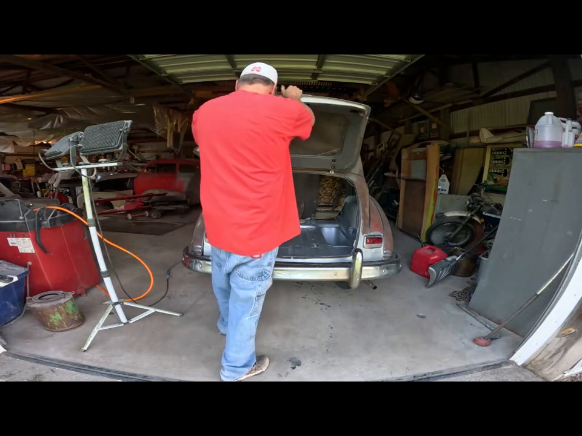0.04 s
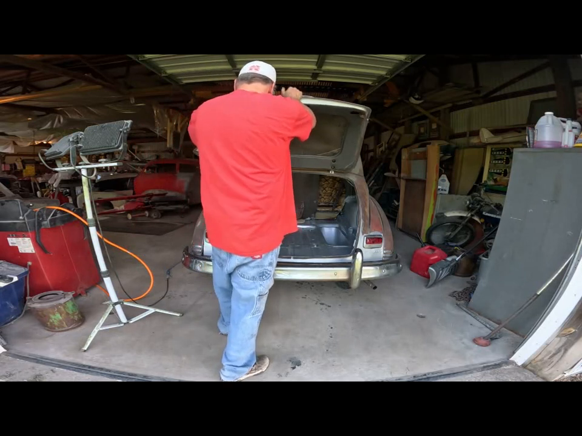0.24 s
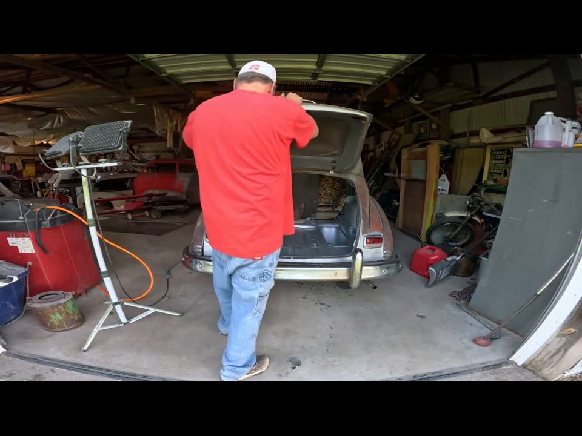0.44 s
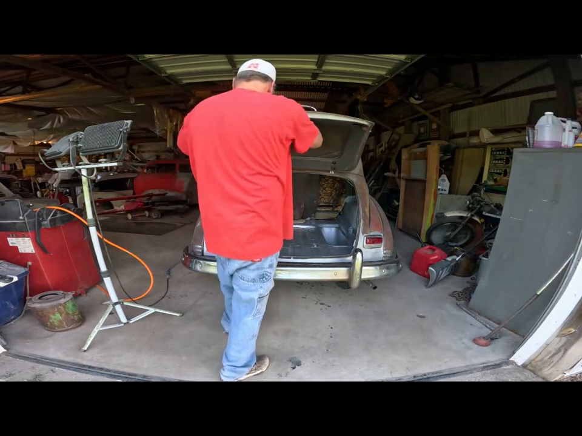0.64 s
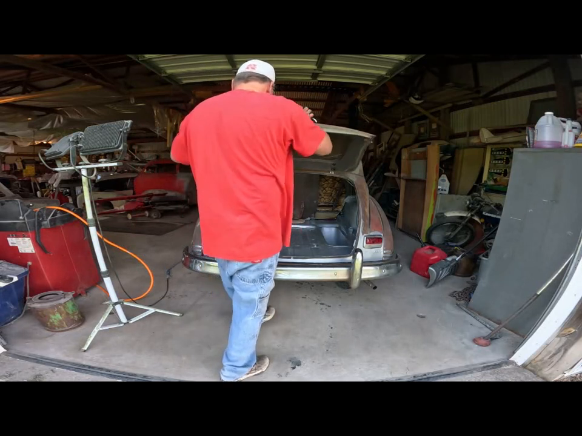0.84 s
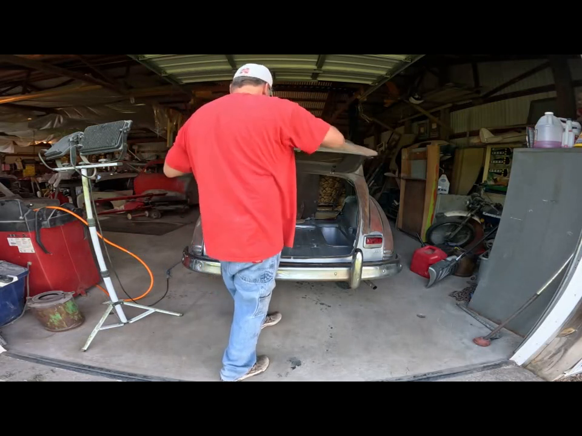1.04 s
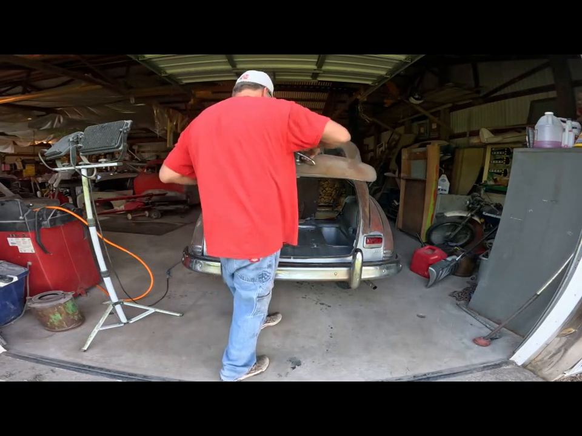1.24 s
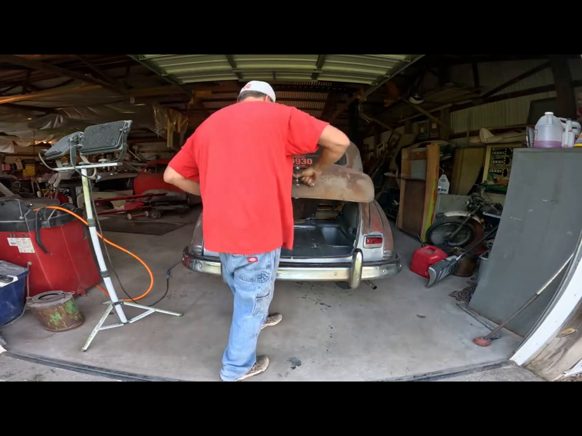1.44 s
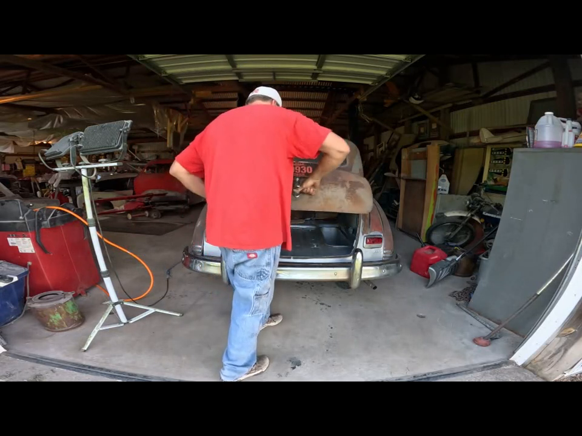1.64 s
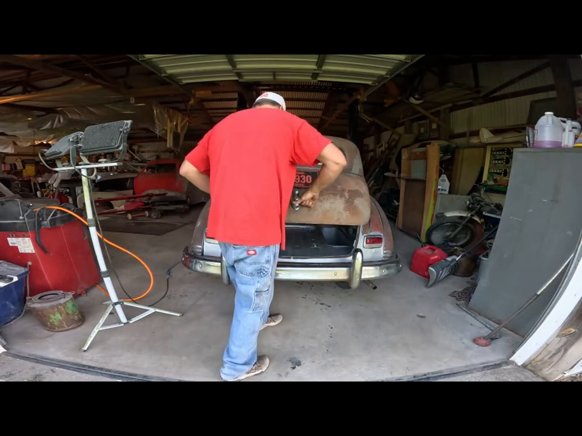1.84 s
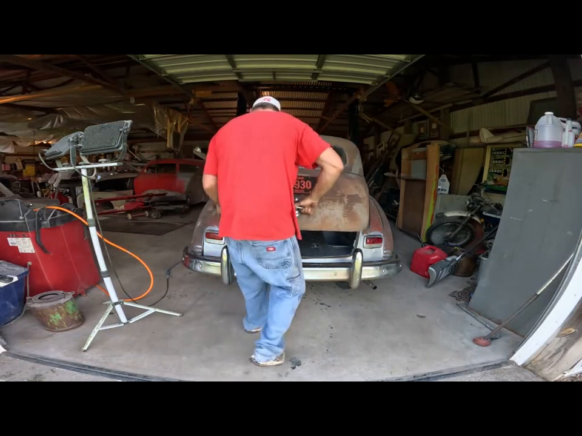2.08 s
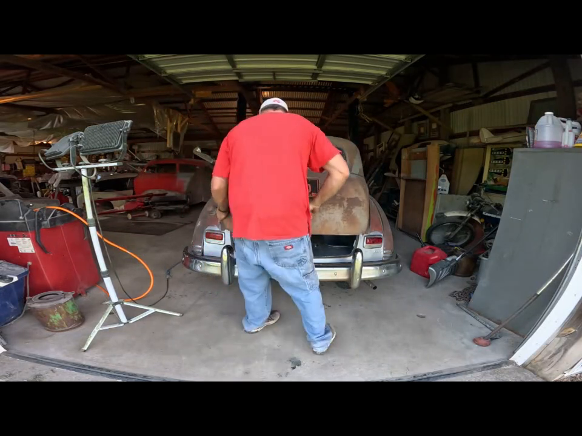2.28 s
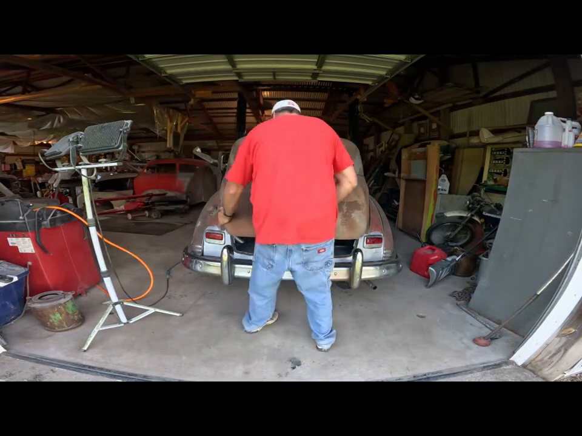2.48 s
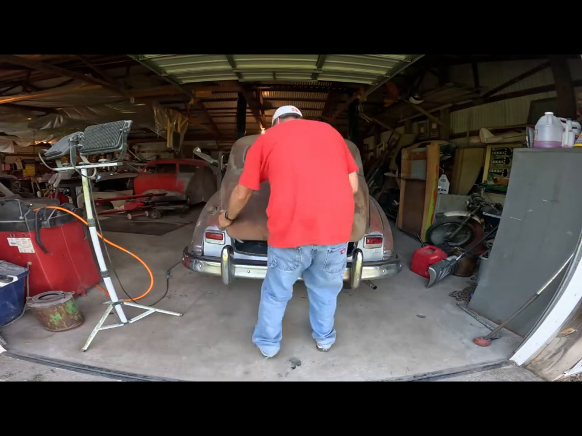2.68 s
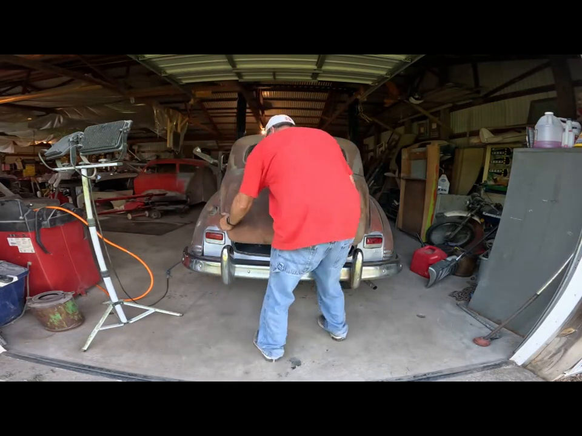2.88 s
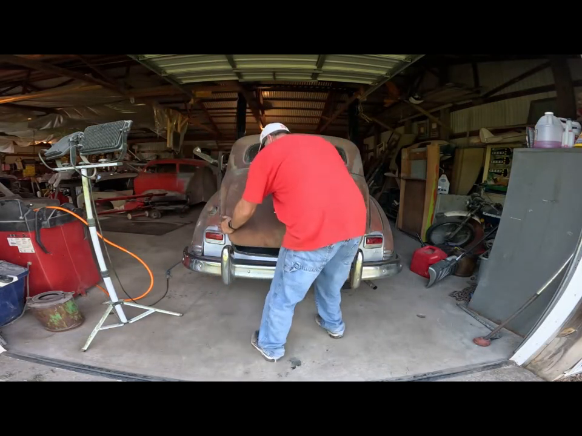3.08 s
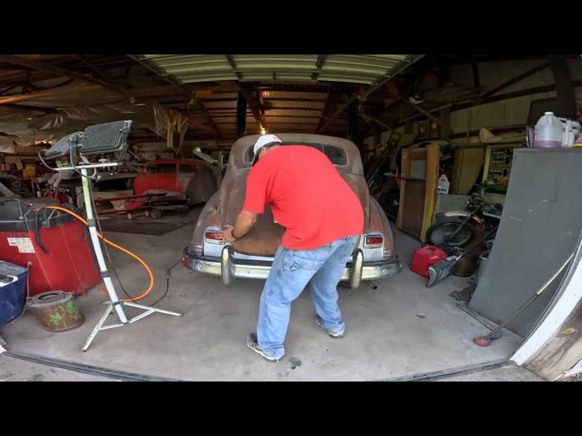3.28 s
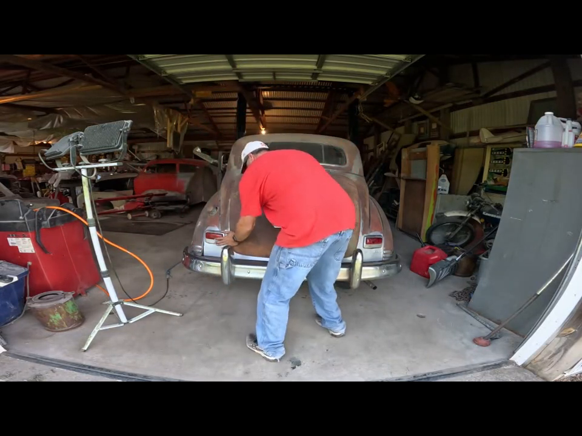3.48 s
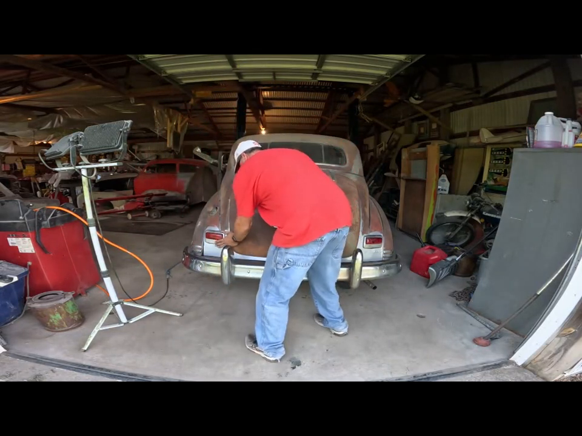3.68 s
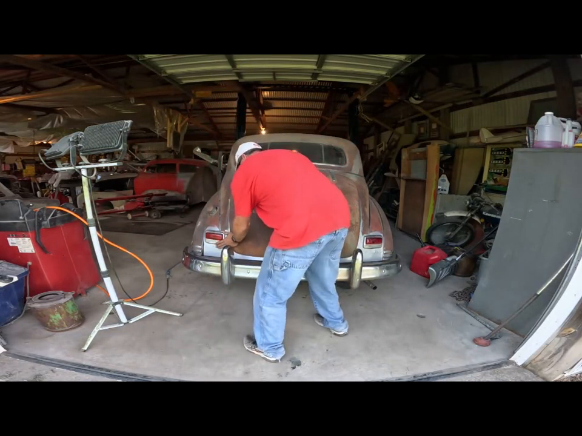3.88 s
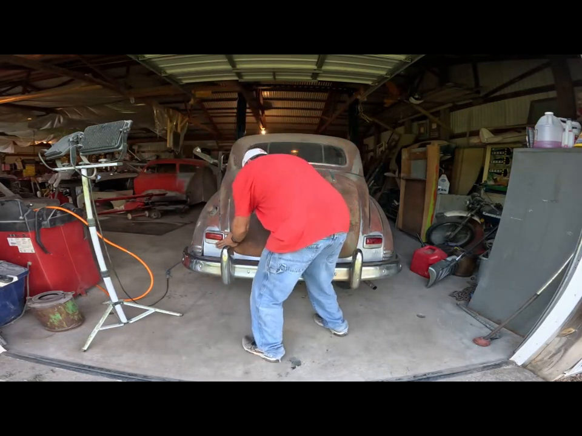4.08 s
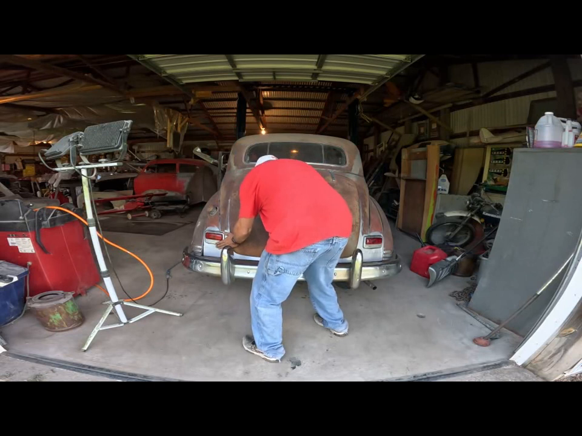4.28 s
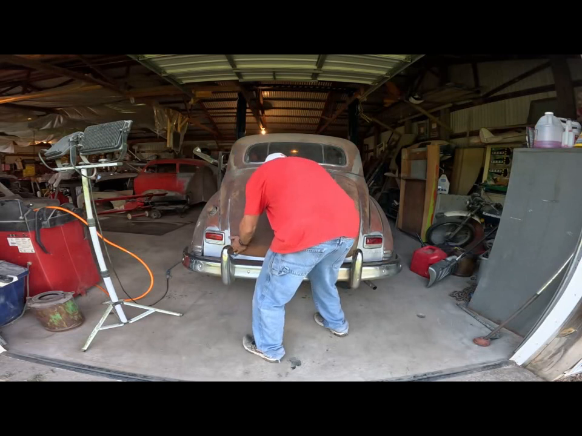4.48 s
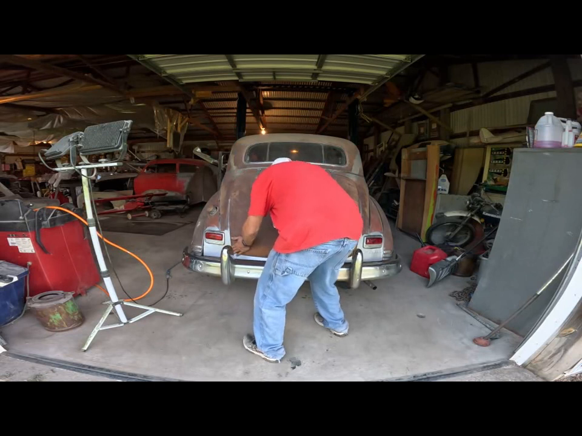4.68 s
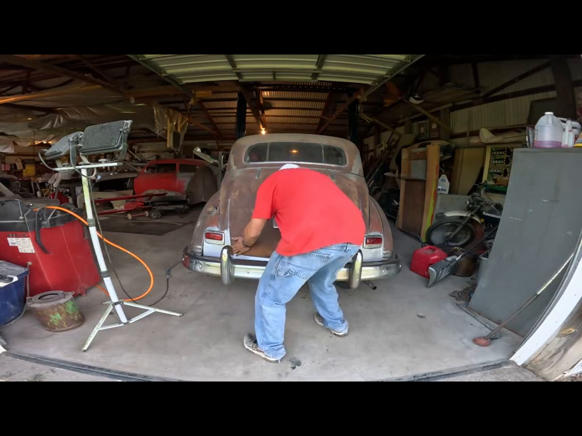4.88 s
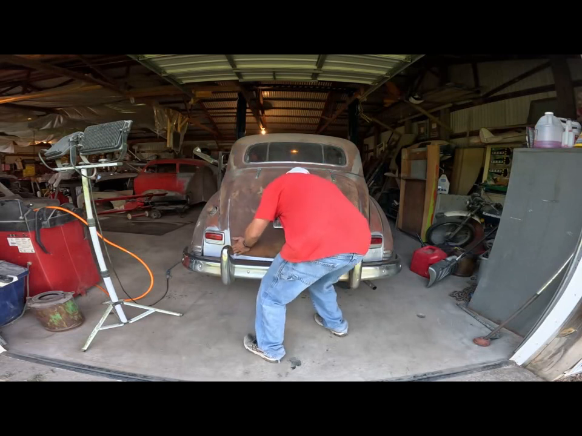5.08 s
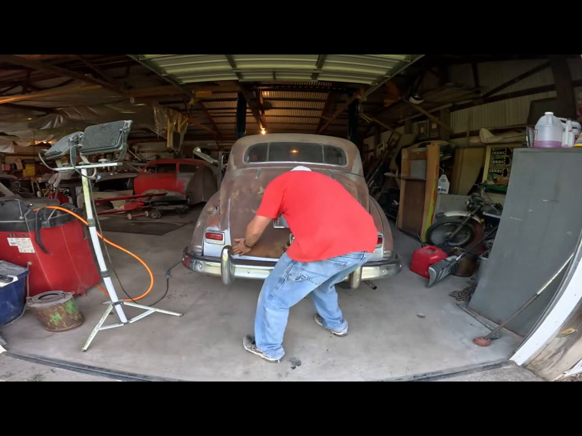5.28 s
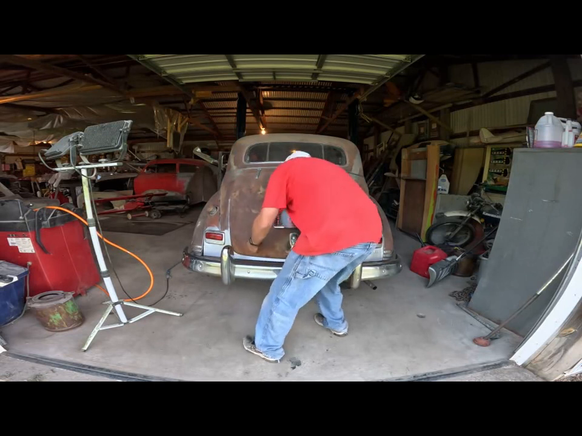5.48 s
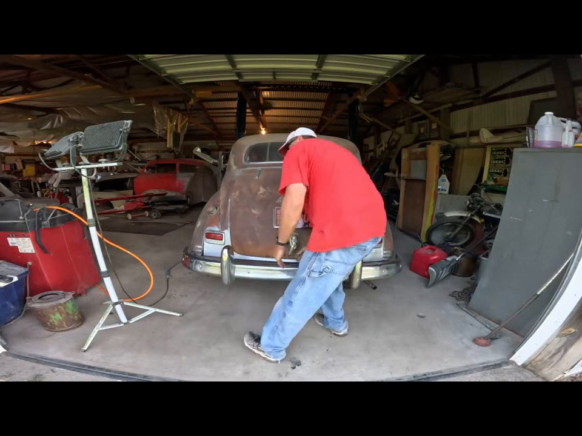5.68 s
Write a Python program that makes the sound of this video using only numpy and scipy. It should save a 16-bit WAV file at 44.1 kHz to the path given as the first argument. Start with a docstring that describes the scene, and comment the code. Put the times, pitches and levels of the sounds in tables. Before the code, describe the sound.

In a reverberant garage, an old car's steel trunk lid is pulled down with a hollow knock, lighter bumps and faint hinge squeaks. Shoes scuff on gritty concrete. The lid slams with a loud, booming bang, and a loose metal part rattles quickly for about a second. Then a hard shove latches it with a sharp thud. The sounds sit slightly right of the microphone, over a faint machine hum.

```python
"""The steel trunk lid of an old car is pulled down, slammed, then shoved until its latch snaps shut.
Each impact excites the bending modes of the sheet; the body and the enclosed air boom, and after
the slam a loose part rattles between two stops. On the way down the hinges knock, scrape and squeak
by stick-slip friction. Shoes scuff gritty concrete and clothes rustle, while the garage
reverberates over a soft background noise and the hum of a distant machine."""
import sys
import numpy as np
from scipy import signal
from scipy.fft import rfft, irfft
from scipy.io import wavfile
from scipy.ndimage import uniform_filter1d

SR = 44100
rng = np.random.default_rng(int(sys.argv[2]) if len(sys.argv) > 2 else 0)


def put_to_file(sound):
    """Save the sound as 16-bit audio at rate SR, in the file named by the first command-line argument."""
    columns = np.atleast_2d(sound).T  # one column per channel
    safe = np.clip(columns, -1, 1)
    whole_steps = np.round(safe * 32767)
    wavfile.write(sys.argv[1], SR, whole_steps.astype(np.int16))


N = 252604
TIME = np.arange(N) / SR
RING = TIME[:SR]  # time axis of a one-second impulse response

# the lid meets its frame, corner by corner: (time [s], level [dB], cutoff [Hz], most excited [Hz])
SLAM = [(3.447, -15, 3000, 448), (3.459, -14, 9700, 1240), (3.471, -31, 4080, 1650),
        (3.485, -20.5, 890, 170), (3.545, -30.5, 3000, 910), (3.591, -29.5, 1500, 505),
        (3.672, -30.5, 2280, 840)]
# modes of the latch and its spring: (frequency [Hz], level [dB], t60 [s])
LATCH_MODES = [(4300, -6, .06), (4544, -1, .13), (4720, -17, .4), (4764, 0, .08), (4860, 7, .025),
               (5730, -3, .04), (6600, 5, .027), (6780, 6, .035), (6880, -15, .35), (9400, -5, .06)]
# spectrum of a sole on concrete: (frequency [Hz], level [dB])
SOLE_SPECTRUM = [(240, -21), (400, 11), (612, 16.5), (907, 6), (1060, 18), (1190, 14), (1520, 15),
                 (2740, 5), (6420, -10), (6920, -10.5), (15000, -37.5)]


def slam(first_t60=0.04, doubling_s=0.017, longest_t60=0.38):
    """Successive impacts: each finds the lid more shaken, so its chatter lasts longer, up to a limit."""
    # spectrum of the slam: (frequency [Hz], level [dB])
    spectrum = [(59, -48.5), (100, -1), (230, -8), (400, -6.5), (594, -9.5), (814, -13.5), (1000, -11.5),
                (1500, -13), (2420, -16.5), (2860, -14), (4180, -20), (5600, -19.5), (6090, -21.5),
                (15000, -42)]
    contacts = []
    for s, db, cutoff_hz, spot_hz in SLAM:
        t60 = min(first_t60 * 2 ** ((s - SLAM[0][0]) / doubling_s), longest_t60)
        contacts.append((s, db, cutoff_hz, t60, spot_hz))
    return lid_impacts(contacts, spectrum, modes_db=-7, crack_db=-18.5, panel_db=-8, panel_t60=0.46,
                       rise_s=0.0053, spot_db=2, bass_cut=0.2)


def shove():
    """Hard impact: a fast rise of force gives a sharp crack as the lid is driven home."""
    # contacts: (time [s], level [dB], cutoff [Hz], chatter t60 [s], most excited [Hz])
    contacts = [(5.152, -31, 1600, 0.052, 1210), (5.159, -10.5, 9000, 0.03, 1300),
                (5.1635, -17, 1600, 0.1, 420), (5.166, -21.5, 240, 0.22, 180), (5.18, -26, 3500, .25, 2200)]
    # spectrum of the shove: (frequency [Hz], level [dB])
    spectrum = [(24, -10), (60, -6), (110, 0), (175, 3.5), (260, -2), (410, -1), (600, -5), (760, -12.5),
                (950, -11), (1150, -4.5), (1380, -7), (1610, -6), (1950, -10), (2500, -15), (2990, -16),
                (3850, -22), (4500, -14), (5300, -20), (6700, -16), (7600, -25), (15000, -49)]
    return lid_impacts(contacts, spectrum, modes_db=-12, crack_db=-6, panel_db=-8, panel_t60=0.55,
                       rise_s=0.0008, spot_db=3, bass_cut=0.24)


def knocks(rebound_s=0.023, knock_t60=0.086, thump_t60=0.26, thump_cutoff_hz=170, thump_spot_hz=162):
    """Contact stiffness sets bandwidth: hard hinge knocks rebound once, soft panel thumps sound dull."""
    # knocks in the hinges: (time [s], level [dB], most excited [Hz], relative rebound level [dB])
    hinge_knocks = [(.004, -18.5, 524, -39), (.015, -18, 235, -11.5), (0.489, -31.5, 163, -3.5),
                    (0.49, -41.5, 1600, -28), (0.541, -28, 252, 2), (0.782, -36, 225, 0.5),
                    (0.93, -40.5, 270, -3), (1.468, -33.5, 554, -31), (1.51, -39.5, 503, -8),
                    (1.617, -38, 534, 5), (1.643, -33.5, 380, -3), (4.087, -35, 604, -3),
                    (4.108, -39.5, 1800, -28), (4.165, -42, 358, -16)]
    # thumps on the middle of the panel: (time [s], level [dB])
    panel_thumps = [(1.569, -37.5), (3.93, -33.5), (4.0, -34), (4.814, -39), (4.913, -43.5)]
    # spectrum of both: (frequency [Hz], level [dB])
    spectrum = [(30, -17), (100, 2.5), (160, 2.5), (240, 4), (330, -2.5), (470, -3), (700, -10.5),
                (1200, -10.5), (2000, -18.5), (4000, -26.5), (9000, -37.5), (15000, -52)]
    contacts = []
    for s, db, spot_hz, rebound_db in hinge_knocks:
        cutoff_hz = 990 * (spot_hz / 300) ** 0.67  # a harder contact excites higher modes
        contacts.append((s, db, cutoff_hz, knock_t60, spot_hz))
        contacts.append((s + rebound_s, db + rebound_db, cutoff_hz, knock_t60, spot_hz))
    hard = lid_impacts(contacts, spectrum, modes_db=-4, crack_db=-13, panel_db=-0.5, panel_t60=0.42,
                       rise_s=0.0017, spot_db=7, bass_cut=0.53)
    contacts = [(s, db, thump_cutoff_hz, thump_t60, thump_spot_hz) for s, db in panel_thumps]
    soft = lid_impacts(contacts, spectrum, modes_db=-14, crack_db=-6.5, panel_db=-4, panel_t60=0.4,
                       rise_s=0.003, spot_db=11, bass_cut=0.47)
    return hard + soft


def lid_impacts(contacts, spectrum, modes_db, crack_db, panel_db, panel_t60, rise_s, spot_db, bass_cut):
    """Impact on a plate: the struck spot favours some modes, and a soft contact acts as a low-pass."""
    # bending modes of the sheet steel: (frequency [Hz], level [dB], t60 [s])
    lid_modes = [(192, 3, .25), (240, 2, .42), (252, 2, .35), (321, -3, .35), (427, 4, .22), (474, -1, .25),
                 (535, 1, .25), (630, 0, .22), (790, -1, .2), (931, 7, .27), (1061, 4, .22), (1159, 5, .16),
                 (1244, 4, .19), (1390, 4, .2), (1568, 5, .17), (1682, 2, .22), (1880, 4, .25),
                 (2015, 3, .25), (2115, 4, .25)]
    steel = unit(colour(ring(lid_modes), spectrum))
    out = np.zeros(N)
    for s, db, cutoff_hz, t60, spot_hz in contacts:
        force = (chatter(t60) + undb(panel_db) * panel(panel_t60)) * (1 - np.exp(-RING / rise_s))
        force[0] += undb(crack_db)
        sound = unit(colour(force, spectrum)) + undb(modes_db) * steel
        sound = shape(sound, lambda hz: spot_db * near(hz, spot_hz, 0.3) + rolloff(hz / cutoff_hz, 1))
        # a stiff spot gives little bass
        sound = shape(sound, lambda hz: rolloff(bass_cut * spot_hz / (hz + 20), 3))
        add(out, s, at_level(sound, db))
    return out


def chatter(t60):
    """A dying swarm of tiny contacts sums to decaying noise, here with its spectrum flattened."""
    swarm = rng.standard_normal(len(RING)) * fade(t60)
    power = uniform_filter1d(abs(rfft(swarm)) ** 2, size=120)
    bin_hz = np.linspace(0, SR / 2, len(power))
    return unit(shape(swarm, lambda hz: -10 * np.log10(np.interp(hz, bin_hz, power))))


def panel(t60, spacing_hz=14):
    """A thin plate has constant modal density: weak modes lie at random, equally dense at all pitches."""
    bins = len(RING) // 2 + 1
    present = rng.random(bins) < SR / len(RING) / spacing_hz
    phases = np.exp(2j * np.pi * rng.random(bins))
    return unit(irfft(present * phases) * fade(t60))


def body():
    """Shell and cavity resonance: the body and its air boom, each push favouring its own low pitch."""
    # modes of the body and the air in the trunk: (frequency [Hz], level [dB], t60 [s])
    body_modes = [(28, 1, 1.0), (38, -5, .9), (50, -4.5, .4), (66, 1, .5), (80, 0, .65), (88, 4, .18),
                  (108, -1, .85), (135, 1, .3), (158, -9, 1.0), (188, 2, .22), (201, -9, 1.0),
                  (322, -7, 1.4), (378, -9, 1.3)]
    # pushes on the body: (time [s], level [dB], most excited [Hz])
    pushes = [(.004, -32.5, 39.2), (0.557, -38, 74), (1.639, -39.5, 40.5), (3.452, -22.5, 89),
              (3.47, -14.5, 47.2), (3.476, -28.5, 170), (3.494, -31, 200), (5.16, -35, 56)]
    out = np.zeros(N)
    for s, db, centre_hz in pushes:
        boom = ring(body_modes, lambda hz: near(hz, centre_hz, octaves=1.17), TIME[:SR * 2])
        add(out, s, undb(db) * boom)
    return out


def shudder(db=-32, centre_hz=192.5, t60=2.34):
    """Free decay: after the slam the rear panels go on shaking, a narrow band of uneven rumble."""
    def band_db(hz):
        skirts = (hz / centre_hz) ** 16 + (centre_hz / np.maximum(hz, 40)) ** 16
        return np.maximum(-10 * np.log10(1 + skirts), -80)
    out = np.zeros(N)
    add(out, SLAM[1][0], undb(db) * noise(band_db) * fade(t60, TIME))
    return out


def draught(db=-33, rise_s=0.0095, cutoff_hz=110):
    """Air displacement: the falling lid squeezes out a low puff that peaks as it lands."""
    outflow = noise(lambda hz: 2 * rolloff(hz / cutoff_hz, 1))
    return undb(db) * outflow * np.exp(-abs(TIME - SLAM[0][0]) / rise_s)


def latch():
    """Impulse response: the catch strikes and its spring rings, each contact favouring some modes."""
    # strikes of the catch: (time [s], level [dB], most excited [Hz])
    strikes = [(3.46, -32.5, 5600), (5.1598, -27, 7100)]
    out = np.zeros(N)
    for s, db, centre_hz in strikes:
        add(out, s, undb(db) * ring(LATCH_MODES, lambda hz: near(hz, centre_hz, octaves=0.65)))
    return out


def zings():
    """Frictional excitation: the skidding catch bows its spring, and uneven slips drive nearby modes."""
    # skids over the striker: (start [s], duration [s], most excited [Hz], level [dB])
    skids = [(3.464, .014, 5730, -33), (3.511, .014, 4750, -35), (3.526, .028, 4800, -30)]
    out = np.zeros(N)
    for s, length, centre_hz, db in skids:
        slips = rng.standard_normal(len(RING)) * np.sin(np.pi * RING / length) * (RING < length)
        spring = ring(LATCH_MODES, lambda hz: near(hz, centre_hz, octaves=0.12))
        add(out, s, at_level(signal.fftconvolve(slips, spring), db))
    return out


def rocking_times(start_s=3.675, gap_s=0.04657, quicken_s=0.000177, limp_s=0.006, limp_ends_s=4.114):
    """Rocking between two stops: the beat quickens, and every second tick is late until it evens out."""
    k = np.arange(21)
    beat = start_s + k * gap_s - quicken_s * k * (k - 1) / 2
    lag = limp_s / (1 + np.exp((beat - limp_ends_s) / 0.03))
    return beat + k % 2 * lag


def rattle(touch_s=0.014, scrape_t60=0.22, scrape_db=-12, grit_db=-10):
    """Repeated contact: a loose metal part grates on each stop, rings and trails off in a dry scrape."""
    # modes of the loose part: (frequency [Hz], level [dB], t60 [s])
    part_modes = [(2540, -7, .008), (3030, 5, .014), (3400, 3, .007), (4340, -4, .007), (5200, -3, .007),
                  (6700, -16, .012), (7420, -14, .015), (8050, -10, .02), (9280, -12, .018)]
    # strength of the rocking: (time [s], level [dB])
    rocking_level = [(3.67, -20.5), (4.33, -18.5), (4.49, -21.5), (4.62, -24)]
    out, size = np.zeros(N), SR // 10
    part = unit(ring(part_modes)[:size])
    pressure = np.exp(-(RING / touch_s) ** 2) + undb(scrape_db) * fade(scrape_t60)
    for s in rocking_times():
        touch = rng.standard_normal(size) * pressure[:size]
        grit = shape(touch, lambda hz: rolloff(hz / 9000, 10) + rolloff(2500 / (hz + 1), 2))
        tick = unit(signal.fftconvolve(touch, part)[:size]) + undb(grit_db) * unit(grit)
        db = np.interp(s, *np.transpose(rocking_level))
        add(out, s, undb(db) * unit(tick))
    return out


def hinge_squeaks(waver=0.025, roughness=0.45):
    """Stick-slip oscillation of dry steel: short glides, unsteady in pitch and strength."""
    # squeaks: (start [s], duration [s], first frequency [Hz], last frequency [Hz], level [dB])
    glides = [(0.125, 0.08, 2820, 2140, -53), (0.64, 0.06, 3230, 3270, -52.5),
              (0.67, 0.12, 3180, 3060, -52), (.69, .08, 3250, 3200, -55), (0.685, 0.115, 2760, 2630, -54),
              (1.168, 0.027, 2270, 2350, -53), (1.185, .03, 2550, 2950, -57),
              (1.208, 0.055, 2460, 1930, -51.5), (1.22, .11, 2950, 2890, -60),
              (1.325, 0.03, 2150, 2900, -55), (1.343, 0.048, 3050, 3180, -49.5),
              (1.375, 0.165, 2510, 2470, -52)]
    out, wobble = np.zeros(N), 1 + waver * wander(1500)
    for s, length, first_hz, last_hz, db in glides:
        size = int(length * SR)
        hz = np.linspace(first_hz, last_hz, size) * wobble[int(s * SR):][:size]
        tone = np.sin(2 * np.pi * np.cumsum(hz) / SR)
        add(out, s, undb(db) * tone * signal.windows.tukey(size, 0.5))
    return out * np.exp(roughness * wander(170))


def hinge_rubs():
    """Sliding friction: the hinge arms scrape in uneven grains that swell with each push."""
    # scrapes: (start [s], duration [s], level [dB])
    scrapes = [(0.562, 0.068, -55), (0.979, 0.13, -56), (1.078, 0.086, -51.5)]
    # spectrum of the hinge arms: (frequency [Hz], level [dB])
    spectrum = [(300, -2), (700, -3), (1150, 10), (1600, 3), (2400, -13), (5000, -10), (12000, -35)]
    out, t = np.zeros(N), TIME[:SR // 2]
    for s, length, db in scrapes:
        friction = grains(len(t), grit_db=3) * np.sin(np.pi * t / length) * (t < length)
        add(out, s, at_level(colour(friction, spectrum), db, length))
    return out


def scuffs(patchy_db=1.8, rasp_hz=3050, tilt_top_hz=9000):
    """Granular friction: grit crunches under a sliding sole, swelling unevenly with the stroke."""
    # slides over concrete: (start [s], duration [s], level [dB])
    slides = [(0.488, 0.035, -52), (0.894, 0.042, -50), (1.984, 0.093, -52), (2.02, 0.23, -55.5),
              (2.272, 0.12, -58), (2.463, 0.027, -54.5), (2.594, 0.18, -51), (2.744, 0.11, -31),
              (2.848, 0.14, -48), (2.956, 0.05, -46.5), (3.024, 0.049, -42.5), (3.146, 0.22, -47.5),
              (4.49, 0.23, -49.5), (4.955, 0.091, -51), (5.031, 0.0041, -50.5), (5.037, 0.32, -52)]
    out, t = np.zeros(N), TIME[:SR // 2]
    for s, length, db in slides:
        # treble slope: a quick flick is brighter than a long drag, a heavy one duller
        tilt_db = 9 - np.log2(length / 0.1) - 0.0545 * (db + 50)
        weight_db = max(db + 50, 0)  # a heavy sole bites sooner and rasps
        skew = 0.9 / (1 + 0.016 * weight_db)
        arch = np.maximum(np.sin(np.pi * (t / length) ** skew) * (t < length), 0) ** 0.97
        crunch = grains(len(t), grit_db=1.5) * arch * undb(patchy_db * wander(74)[:len(t)])

        def sole_db(hz):
            tilt = tilt_db * np.log2(1 + np.minimum(hz, tilt_top_hz) / 1000)
            rasp = 0.5 * weight_db * near(hz, rasp_hz, octaves=0.78)
            return at_hz(SOLE_SPECTRUM, hz) + tilt + rasp
        add(out, s, at_level(shape(crunch, sole_db), db, length))
    return out


def footfalls(thud_t60=0.099, slap_t60=0.03, slap_db=-7):
    """Damped impact: a shoe lands on concrete with a dead thud under the short slap of its sole."""
    # landings: (time [s], level [dB], thud cutoff [Hz])
    landings = [(2.847, -33, 255), (3.045, -41.5, 454)]
    out = np.zeros(N)
    for s, db, cutoff_hz in landings:
        thud = shape(chatter(thud_t60),
                     lambda hz: rolloff(hz / cutoff_hz, 3) + rolloff(cutoff_hz / 2 / (hz + 1), 1))
        slap = colour(chatter(slap_t60), SOLE_SPECTRUM)
        add(out, s, at_level(unit(thud) + undb(slap_db) * unit(slap), db))
    return out


def hiss_and_rustle():
    """Enveloped noise: a short hiss trails the first knock, then cloth rustles in two slow swells."""
    # the hiss, then the two swells: (peak time [s], half duration [s], level [dB])
    swells = [(0, 0.03, -37), (1.034, 0.62, -52), (3.284, 2.77, -53.5)]
    # spectrum of hiss and rustle: (frequency [Hz], level [dB])
    spectrum = [(400, 14.5), (1200, 6), (2500, 3.5), (4500, -6.5), (8000, -12), (12000, -25), (15000, -59)]
    strength = sum(undb(db) * np.exp(-((TIME - s) / half_s) ** 2) for s, half_s, db in swells)
    return diffuse_noise(spectrum, strength, flicker=0.019, rate_hz=120)


def garage(first_s=0.0032, build_s=0.0079, far_wall_s=0.15, far_spread_s=0.034, far_db=4):
    """Reverberation: reflections build up, swell once off the far wall and decay octave by octave."""
    # reverberation time: (frequency [Hz], t60 [s])
    decay_times = [(60, 1.2), (200, 1.59), (1000, 0.79), (3000, 1.09), (6000, 0.55), (12000, 1.2)]
    # spectrum of the reflections: (frequency [Hz], level [dB])
    spectrum = [(40, -11), (150, -4), (400, -10), (780, -2.5), (1200, 4), (2000, 1), (5000, -0.5),
                (12000, -5)]
    hz = np.arange(len(RING) // 2 + 1) * SR / len(RING)
    centres = 62.5 * 2. ** np.arange(9)
    reflections = rfft(rng.standard_normal((2, len(RING)))) * undb(at_hz(spectrum, hz))
    tails = np.zeros((2, len(RING)))
    for centre in centres:
        band = at_hz(np.column_stack([centres, centres == centre]), hz)
        tails += irfft(reflections * band) * fade(at_hz(decay_times, centre))
    tails *= undb(far_db * np.exp(-((RING - far_wall_s) / far_spread_s) ** 2))
    mid, side = tails * (1 - np.exp(-np.maximum(RING - first_s, 0) / build_s))
    return spread(unit(mid), unit(side))


def direct_path(x, scatter_t60=0.02):
    """Phase and level differences place the sound to the right; nearby surfaces scatter its treble."""
    # phase difference: (frequency [Hz], left lead [rad])
    left_lead = [(100, 0), (500, -.15), (1500, -.35), (3900, -.55), (7500, -.4), (11000, -.3)]
    # level difference: (frequency [Hz], left minus right [dB])
    balance = [(110, 0.56), (400, -1.6), (1300, -2.3), (4400, .6)]
    # scattered sound: (frequency [Hz], side against mid [dB])
    scatter_spectrum = [(150, -44), (2000, -18), (4500, -20), (7500, -11)]
    hz = np.arange(N // 2 + 1) * SR / N
    left_gain = undb(at_hz(balance, hz) / 2) * np.exp(0.5j * at_hz(left_lead, hz))
    placed = irfft(rfft(x) * np.array([left_gain, 1 / left_gain]), N)
    scatter = signal.fftconvolve(x, colour(chatter(scatter_t60), scatter_spectrum))[:N]
    return placed + np.array([[1], [-1]]) * scatter


def hum(sway=0.24, drift_rad=1.89):
    """Line spectrum of a distant machine: each tone is slowly modulated in amplitude and phase."""
    # tones: (frequency [Hz], level [dB])
    tones = [(59, -52.5), (179, -55.5), (319, -60), (378, -63), (518, -62), (1391, -66)]
    out = np.zeros(N)
    for hz, db in tones:
        strength = undb(db) * np.exp(sway * wander(14))
        out += strength * np.sin(2 * np.pi * hz * TIME + drift_rad * wander(12))
    return out


def ambience(envelope, db=-49):
    """Diffuse background noise, strongest in the bass."""
    # spectrum of the background: (frequency [Hz], level [dB])
    spectrum = [(15, -31), (25, 3.5), (70, 0), (119, -10.5), (192, -3), (257, -13), (392, -16.5),
                (460, -21.5), (584, -9.5), (846, -24), (1400, -17.5), (2500, -38.5), (6670, -36.5),
                (9410, -68), (14000, -107)]
    return diffuse_noise(spectrum, undb(db) * envelope, flicker=0.04, rate_hz=8)


def diffuse_noise(spectrum, strength, flicker, rate_hz):
    """Random amplitude modulation: stereo noise flickers about a given strength."""
    mid, side = (noise(lambda hz: at_hz(spectrum, hz)) * strength * np.exp(flicker * wander(rate_hz))
                 for _ in range(2))
    return spread(mid, side)


def spread(mid, side):
    """Coherence of a diffuse field: two close points are alike in the bass, less so in the treble."""
    # stereo width: (frequency [Hz], side against mid [dB])
    width = [(40, -22), (125, -19), (250, -13), (500, -12.5), (1000, -11), (2000, -8), (8000, -5.5)]
    return mid + np.array([[1], [-1]]) * colour(side, width)


def ring(modes, weight=lambda hz: 1, t=RING):
    """Modal superposition: a sum of damped sinusoids after one push."""
    return sum(undb(db) * weight(hz) * np.sin(2 * np.pi * hz * t) * fade(t60, t)
               for hz, db, t60 in modes)


def grains(size, grit_db):
    """Rough contact: noise with occasional much stronger grains."""
    return rng.standard_normal(size) * undb(grit_db * rng.exponential(size=size))


def noise(db_at):
    """Filtered Gaussian noise of unit RMS."""
    return unit(shape(rng.standard_normal(N), db_at)) * np.sqrt(N)


def wander(rate_hz):
    """Smooth random fluctuation of unit standard deviation."""
    hold = int(SR / rate_hz)
    steps = np.repeat(rng.standard_normal(N // hold + 1), hold)
    smooth = uniform_filter1d(uniform_filter1d(steps, hold), hold)[:N]
    return smooth / smooth.std()


def shape(x, db_at, size=4096):
    """Minimum-phase filter whose gain in dB is a function of frequency."""
    hz = np.arange(size + 1) * SR / size / 2
    cepstrum = irfft(np.log(undb(db_at(hz))))
    cepstrum[1:size] *= 2  # folding onto positive time makes the filter causal
    cepstrum[size + 1:] = 0
    response = irfft(np.exp(rfft(cepstrum)))[:size]
    return signal.fftconvolve(x, response)[:len(x)]


def colour(x, spectrum):
    """Filter by a table of (frequency [Hz], level [dB])."""
    return shape(x, lambda hz: at_hz(spectrum, hz))


def at_hz(points, hz):
    """Interpolate (frequency [Hz], value) points on a logarithmic frequency axis."""
    frequencies, values = np.transpose(points)
    return np.interp(np.log(np.maximum(hz, 1)), np.log(frequencies), values)


def rolloff(ratio, order):
    """Filter gain in dB: low-pass for frequency / cutoff, high-pass for the inverse."""
    return -10 * np.log10(1 + ratio ** (2 * order))


def near(hz, centre_hz, octaves):
    """Bell-shaped weight around a frequency."""
    return np.exp(-(np.log2(np.maximum(hz, 1) / centre_hz) / octaves) ** 2)


def fade(t60, t=RING):
    """Exponential decay by 60 dB in t60 seconds."""
    return np.exp(-np.log(1000) * t / t60)


def undb(db):
    """Decibels to amplitude ratio."""
    return 10 ** (np.asarray(db) / 20)


def unit(x):
    """Scale to unit energy."""
    return x / np.sqrt(np.sum(x ** 2))


def at_level(x, db, seconds=0.02):
    """Scale to the energy of a steady sound of this RMS level and duration."""
    return undb(db) * np.sqrt(seconds * SR) * unit(x)


def add(track, s, sound):
    """Mix a sound into a track at s seconds."""
    i = max(int(s * SR), 0)
    track[i:i + len(sound)] += sound[:N - i]


def scene():
    """Superposition of direct sound, garage reverberation and diffuse noise."""
    knocking, slamming, shoving = knocks(), slam(), shove()
    squeaks = hinge_squeaks()
    catch = latch() + zings()
    ticks = rattle()
    hinges = squeaks + hinge_rubs()
    feet = scuffs() + footfalls()
    background_fade = undb(-49 * np.maximum(TIME - 5.3, 0))  # 49 dB per second after 5.3 s
    direct = knocking + slamming + shoving + catch + ticks + hinges + feet
    direct += body() + shudder() + draught() + hum() * background_fade
    to_room = (undb(-19.5) * knocking + undb(-10) * (slamming + catch + hinges)
               + undb(-12.5) * shoving + undb(-17) * ticks + undb(-17.5) * feet)
    reverberation = signal.fftconvolve(to_room[None], garage(), axes=1)[:, :N]
    diffuse = hiss_and_rustle() + ambience(background_fade)
    return direct_path(direct) + reverberation + diffuse


def record(dry, soften_hz=12000, top_hz=15600):
    """Soft saturation rounds the highest peaks; a gentle and a steep low-pass cut the top."""
    dull = signal.sosfilt(signal.butter(2, soften_hz, fs=SR, output="sos"), np.tanh(dry))
    return signal.sosfilt(signal.ellip(8, 0.2, 70, top_hz, fs=SR, output="sos"), dull)


dry = scene()
out = record(dry)
put_to_file(out)
```